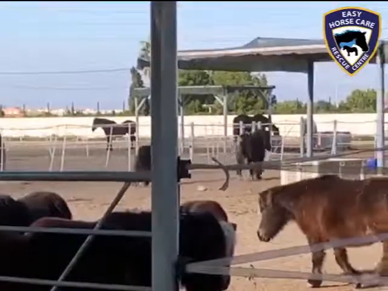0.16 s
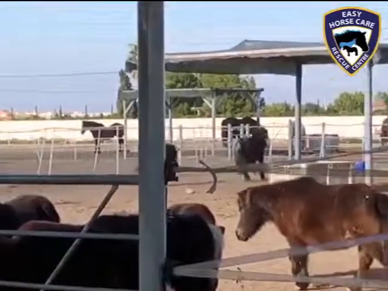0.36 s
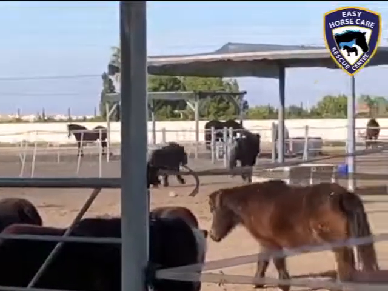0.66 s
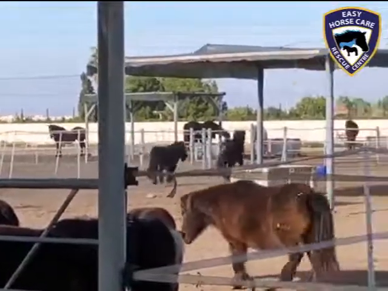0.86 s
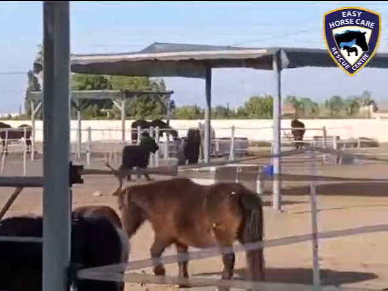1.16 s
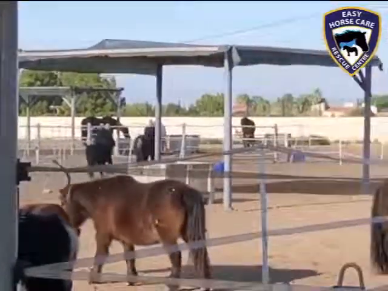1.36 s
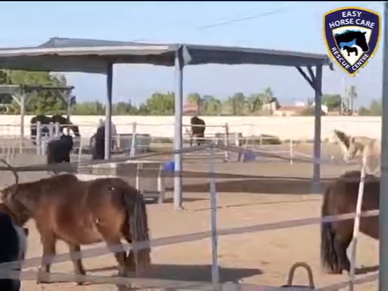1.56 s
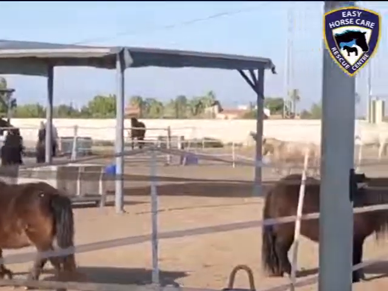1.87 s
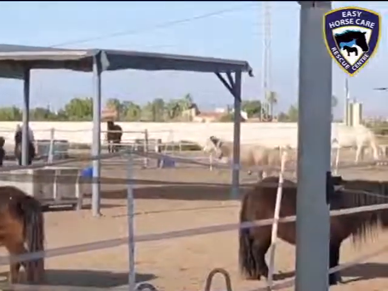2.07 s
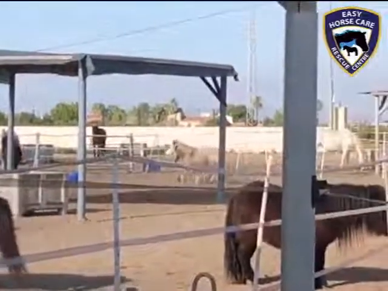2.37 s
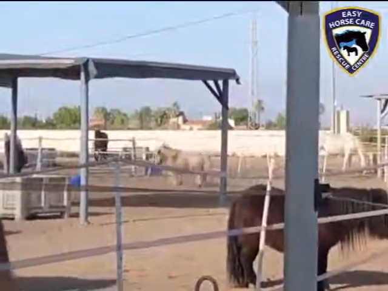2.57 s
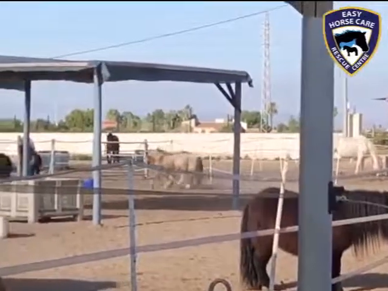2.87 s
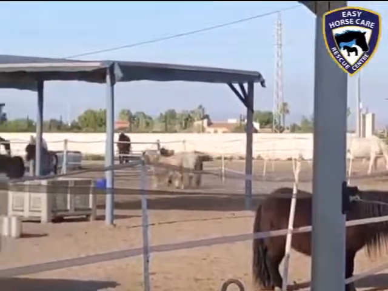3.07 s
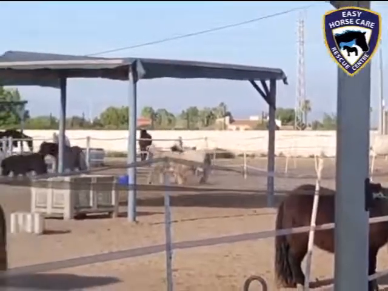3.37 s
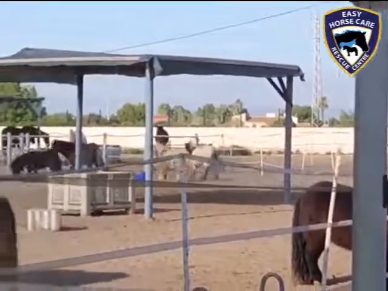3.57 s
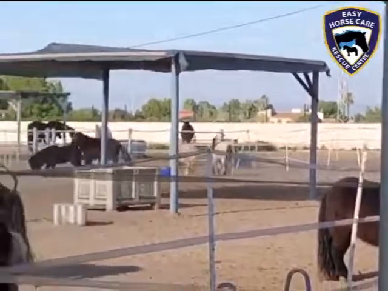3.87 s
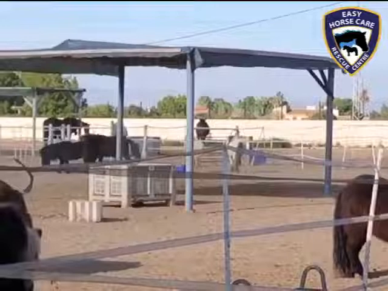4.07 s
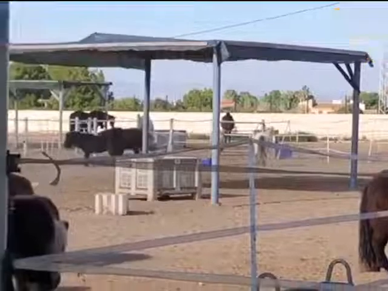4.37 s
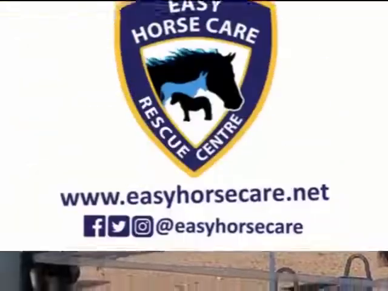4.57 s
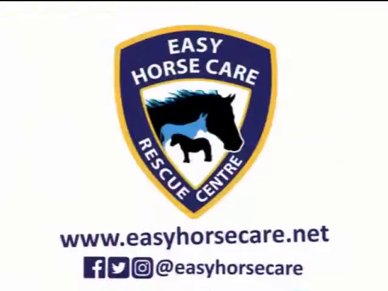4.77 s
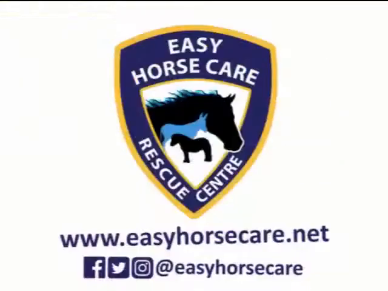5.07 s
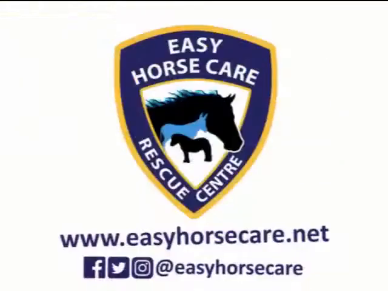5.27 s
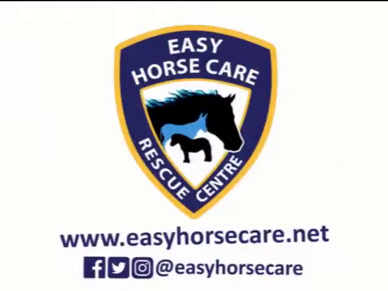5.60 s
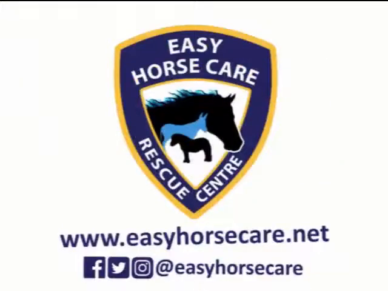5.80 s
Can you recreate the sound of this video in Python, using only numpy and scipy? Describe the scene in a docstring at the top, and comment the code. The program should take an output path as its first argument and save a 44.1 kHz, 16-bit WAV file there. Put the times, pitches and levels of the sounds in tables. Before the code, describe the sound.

Sparrow chirps, thin finch twitters and short buzzes over a soft distant hum, with four dry, sharp snaps at a steady pace. The ambience then gives way to a hissier, rumbling close pickup: breath thumps the microphone, one horse neighs high and wavering with a gritty throaty layer underneath, then cracks into low, flapping grunts and rasping breath.

```python
"""In a quiet paddock with far traffic (shaped noise), sparrows and a finch sing gliding sines and buzzing clicks,
while an electric fence sparks four times at a steady pace, each spark an impulse through resonances.
As the paddock fades, a hiss and rumble come in and a horse whinnies close to a microphone: a low fold vibration
and a high whistle, two oscillators whose sum and difference tones mix in the throat.
Breath thumps on the microphone; the neigh turns rough and ends in low grunts, slapping folds and rasping air."""
import sys
import numpy as np
from scipy import signal
from scipy.fft import rfft, irfft, next_fast_len
from scipy.io import wavfile
from scipy.ndimage import uniform_filter1d, map_coordinates

SR = 44100
rng = np.random.default_rng(int(sys.argv[2]) if len(sys.argv) > 2 else 0)


def log_audio(samples):
    """Write samples as a 16-bit WAV file to the path given in sys.argv[1]."""
    # one column per channel
    frames = np.atleast_2d(samples).T
    # limit to full scale, then quantise
    limited = np.clip(frames, -1, 1)
    pcm = np.round(limited * 32767).astype(np.int16)
    wavfile.write(sys.argv[1], SR, pcm)


N = 261909
T = np.arange(N) / SR  # time in seconds


def amp(db):
    """Level law: decibels to an amplitude ratio."""
    return 10 ** (np.asarray(db) / 20)


def unit(x):
    """Normalisation to an rms of 1."""
    return x / np.sqrt(np.mean(x ** 2) + 1e-20)


def curves(rows):
    """Linear interpolation: one value per sample for each column after the time."""
    s, *columns = np.transpose(rows)
    return [np.interp(T, s, column) for column in columns]


def during(rows):
    """Gating: 1 while a table lasts, with soft edges."""
    inside = (T > rows[0][0]) & (T < rows[-1][0])
    return uniform_filter1d(1. * inside, size=600)


def wobble(rate):
    """Band-limited random modulation: a smooth curve through rate random knots a second."""
    coarse = T[::16]
    knots = rng.standard_normal(int(N * rate / SR) + 4)
    return np.interp(T, coarse, map_coordinates(knots, [coarse * rate]))


def filtered(x, response):
    """Linear filtering: the spectrum of x times a complex response of frequency."""
    m = next_fast_len(N + SR // 2)
    return irfft(rfft(x, m) * response(np.fft.rfftfreq(m, 1 / SR)), m)[..., :N]


def resonances(modes):
    """Modal superposition: causal resonances of (Hz, width in Hz, dB) with alternating signs."""
    def response(f):
        total = 0
        for k, (centre, width, db) in enumerate(modes):
            damping = 1j * f * width
            total = total + (-1) ** k * amp(db) * damping / (centre * centre - f * f + damping)
        return total
    return response


def rush(spectrum, patchy_db):
    """Turbulence noise: coloured noise of rms 1 whose gain varies in random time-frequency patches."""
    z = signal.stft(rng.standard_normal(N), nperseg=512)[2]
    across_bands = uniform_filter1d(rng.standard_normal(z.shape), size=6, axis=0)
    patches = uniform_filter1d(across_bands, size=12, axis=1)
    x = signal.istft(z * amp(patchy_db * unit(patches)), nperseg=512)[1][:N]
    f, db = np.transpose(spectrum)
    return unit(filtered(x, lambda hz: amp(np.interp(np.log(hz + 1), np.log(f + 1), db))))


def echoes(x, t60, wet_db):
    """Diffuse reverberation: x plus a noise tail that falls 60 dB in t60 seconds."""
    t = T[:SR // 3]
    tail = amp(-60 * t / t60) * rng.standard_normal(len(t))
    return x + amp(wet_db) * signal.fftconvolve(x, tail / np.linalg.norm(tail))[:N]


def dull(x, hz, floor_db):
    """Treble shelving: a steep step down above hz to floor_db, then a steep cut above 12.8 kHz."""
    return filtered(x, lambda f: amp(floor_db) / (1 + (f / 12800) ** 30) + 1 / (1 + (f / hz) ** 24))


# The paddock fading away. Each row: time in seconds, level in dB.
YARD_LEVEL = [(0, -54), (4.1, -53), (4.5, -60), (4.8, -75)]
# Spectrum of the paddock. Each row: frequency in Hz, relative density in dB.
YARD_COLOUR = [(12, -40), (30, -36), (55, 1), (85, 1), (200, -15), (400, -20), (1100, -24), (2000, -29.5),
               (2650, -36.5), (4000, -35), (7200, -39), (9300, -46.5), (11500, -52), (13000, -74),
               (15800, -71)]
# Hiss fading in with the horse. Each row: time in seconds, level in dB.
HISS_LEVEL = [(4.1, -68), (4.4, -57.5), (4.8, -51), (5.94, -49)]
# Spectrum of the hiss. Each row: frequency in Hz, relative density in dB.
HISS_COLOUR = [(150, -25), (300, -25), (800, -5), (1100, -21.5), (2750, -16), (4800, -18), (6200, -5.5),
               (6800, -15.5), (7300, -29.5), (9300, -30.5), (13400, -51.5), (13800, -65)]
# Spectrum of the rumble. Each row: frequency in Hz, relative density in dB.
RUMBLE_COLOUR = [(12, -1.5), (40, -2), (110, -6.5), (200, -120)]


def background():
    """Shaped noise with slowly changing level: far traffic and leaves, then rumble and equally strong hiss."""
    yard = amp(curves(YARD_LEVEL)[0] + wobble(0.35)) * rush(YARD_COLOUR, patchy_db=2)
    hiss = rush(HISS_COLOUR, patchy_db=1.5)
    rumble = rush(RUMBLE_COLOUR, patchy_db=2.0)
    return yard + amp(curves(HISS_LEVEL)[0]) * during(HISS_LEVEL) * (hiss + rumble)


def song(notes, arch, flutter_db, warble):
    """Frequency modulation: each note is a sine that glides on an arch, with a fast warble."""
    out, shake = np.zeros(N), 1 + warble * wobble(130)
    for s, length, middle, glide, db in notes:
        u = np.linspace(-1, 1, int(length * SR))
        start = round(s * SR)
        at = slice(start, start + len(u))
        hz = (middle * (1 - arch * u ** 2) + glide / 2 * u) * shake[at]
        swell = np.sqrt(1 - u ** 2)
        out[at] += amp(db) * swell * np.sin(2 * np.pi * np.cumsum(hz) / SR)
    return out * amp(flutter_db * wobble(120))


def chatter(near, count, low_hz, high_hz, length, sweep, db):
    """Random point process: far birds' notes bunch up around the near bird's notes."""
    a, b = rng.random((count, 3)), rng.standard_normal((count, 3))
    hz = low_hz + (high_hz - low_hz) * a[:, 1]
    neighbour = (a[:, 0] * len(near)).astype(int)
    s = np.abs(np.array(near)[neighbour, 0] + .07 * b[:, 2])
    return np.c_[s, length * (.5 + a[:, 2]), hz, hz * sweep * b[:, 0], db + 2.5 * b[:, 1]]


# Runs of finch ticks. Each row: start in seconds, length in seconds, mean relative level in dB.
TWITTER_RUNS = [(0.853, .45, -73), (2.32, .27, -65), (2.968, .26, -68), (3.766, .2, -68)]
TICK_GAP_S, TICK_S = .058, .009
TICK_HZ, TICK_GLIDE_HZ = 6500, -2400  # mean pitch, steep fall


def ticks():
    """Periodic repetition: evenly spaced falling notes whose pitch and level scatter."""
    notes = []
    for s, length, db in TWITTER_RUNS:
        for t in np.arange(s, s + length, TICK_GAP_S):
            hz = TICK_HZ * (1 + 0.054 * rng.standard_normal())
            notes.append((t, TICK_S, hz, TICK_GLIDE_HZ, db + 2 * rng.standard_normal()))
    return notes


# Finch buzzes. Each row: start in seconds, length in seconds, mean relative level in dB.
BUZZES = [(2.795, 0.13, -66.5), (3.559, 0.092, -62.5), (4.06, 0.05, -62)]
# Resonances of the beak. Each row: frequency in Hz, width in Hz, level in dB.
BEAK = [(6040, 710, -8.5), (6850, 120, -3), (7650, 500, -17)]
BUZZ_PER_S = 160  # mean click rate


def buzzes():
    """Source and filter: fast, slightly irregular click trains excite the beak's resonances."""
    clicks = np.zeros(N)
    for s, length, db in BUZZES:
        t = np.arange(0, length, 1 / BUZZ_PER_S)
        swell = np.sin(0.48 + 2.36 * t / length)
        at = ((s + t + .0008 * rng.standard_normal(len(t))) * SR).astype(int)
        # 40 dB makes up for the little energy of a one-sample click
        clicks[at] = swell * amp(db + 40.0 + 3.8 * rng.standard_normal(len(t)))
    return filtered(clicks, lambda f: resonances(BEAK)(f) * np.exp(-((f - 6800) / 1800) ** 4))


# Near sparrow chirps. Each row: start in seconds, length in seconds, middle in Hz, glide in Hz,
# relative level in dB.
SPARROWS = [(.135, 0.044, 4200, -1400, -75), (.345, 0.048, 3930, 500, -58), (.4, 0.025, 3450, -300, -58),
            (.66, 0.042, 3900, 302, -69), (.905, 0.018, 5200, -1600, -66), (.94, 0.045, 3710, -200, -62.5),
            (1.02, 0.044, 3230, 300, -66), (1.085, .016, 4260, -400, -57),
            (1.13, 0.045, 3595, -1100, -61.5), (1.435, 0.067, 4400, -900, -69),
            (1.49, 0.049, 3840, -600, -61), (1.625, 0.022, 3760, 800, -65),
            (1.89, 0.026, 4300, 1798, -63.5), (1.99, 0.053, 3770, 800, -61.5), (2.005, 0.012, 5680, 0, -59),
            (2.278, 0.038, 3350, -400, -57.5), (2.37, 0.024, 3810, 300, -57),
            (2.39, 0.032, 3320, -50, -59.5), (2.91, 0.068, 4480, -2200, -63.5),
            (2.975, .03, 3330, -300, -65), (3.234, 0.027, 4210, 500, -56.5),
            (3.25, .051, 3320, -500, -59.5), (3.275, 0.026, 3930, -250, -61.5),
            (3.669, 0.042, 4530, 598, -65), (3.681, 0.028, 5220, 600, -55),
            (3.924, 0.055, 4100, -1100, -60), (3.96, 0.047, 3620, 304, -56.5),
            (4.004, 0.014, 5420, 200, -51.5), (4.24, .05, 4310, -900, -64)]
# Near finch notes. Each row: start in seconds, length in seconds, middle in Hz, glide in Hz,
# relative level in dB.
FINCH = [(.53, .035, 6170, -500, -70), (1.555, .067, 6800, 1100, -68), (1.71, 0.051, 7600, 2200, -73),
         (1.97, 0.012, 7500, 1200, -68), (2.142, 0.0047, 6600, 2400, -60), (2.2, 0.023, 6470, -100, -63),
         (2.262, .013, 6160, -2300, -62.5), (2.635, 0.055, 7160, 505, -67), (2.753, 0.02, 5630, 900, -64),
         (3.018, 0.013, 7600, 600, -63), (3.12, 0.014, 7500, 300, -56.5),
         (3.252, 0.054, 6630, -2300, -56.5), (3.382, 0.0071, 7620, -2500, -56.5),
         (3.397, .014, 6900, -2500, -58), (3.5, .011, 7050, -2200, -61.5), (3.79, 0.012, 6970, -400, -52.5),
         (3.953, 0.02, 7430, -1100, -58)]
SPARROW_ARCH, FINCH_ARCH = 0.0847, 0.037  # share by which the arch lowers a note's ends


def birds():
    """Superposition: near and far notes of each species share one reverberant tail."""
    far = chatter(SPARROWS, count=300, low_hz=2900, high_hz=5000, length=.022, sweep=.24, db=-74)
    twitter = chatter(FINCH, count=80, low_hz=5700, high_hz=7700, length=.009, sweep=.16, db=-71)
    chirps = song(np.r_[SPARROWS, far], SPARROW_ARCH, flutter_db=3, warble=.025)
    notes = song(np.r_[FINCH, ticks(), twitter], FINCH_ARCH, flutter_db=2, warble=.008)
    sparrows = echoes(chirps, t60=.2, wet_db=-2)
    finch = echoes(notes + buzzes(), t60=.1, wet_db=-10)
    return amp(0.5) * sparrows + amp(5) * finch


# Relative level of each spark, in dB.
SPARK_DB = [-52, -34, -32.5, -33]
# Direct snap, then ground, posts and wall. Each row: delay in seconds, relative level in dB.
SPARK_ECHOES = [(0, 2), (.0014, 5), (.003, -13), (0.018, -11)]
# Resonances of the snap. Each row: frequency in Hz, width in Hz, level in dB.
SNAP = [(3460, 6400, -17.5), (5600, 1600, 0), (8400, 5200, -6), (11200, 1800, -17)]
SPARK_S, SPARK_GAP_S = .315, 1.2292  # first spark, spacing


def fence():
    """Impulse response: each spark is one snap with close reflections."""
    snaps = np.zeros(N)
    for k, db in enumerate(SPARK_DB):
        for lag, echo_db in SPARK_ECHOES:
            at = round((SPARK_S + k * SPARK_GAP_S + lag) * SR)
            snaps[at] += amp(db + echo_db + 12.5)
    return echoes(filtered(snaps, resonances(SNAP)), t60=0.035, wet_db=-1.5)


def pushes(events, length):
    """Pressure pulses: smooth single humps of the given length in seconds."""
    return sum(amp(db) * np.exp(-((T - s) / length) ** 2) for s, db in events)


# Air puffs on the microphone. Each row: time in seconds, level in dB.
THUMPS = [(4.7171, -14), (4.828, -29)]


def thumps():
    """Damped oscillation: a puff dents the diaphragm, which swings back at 72 Hz and settles."""
    out = -pushes(THUMPS, .0005)
    for s, db in THUMPS:
        u = np.maximum(T - s, 0)
        out += amp(db) * np.sin(2 * np.pi * 72 * u) * np.exp(-u / .0045)
    return out


# Exhaled air sweeping the microphone. Each row: start in seconds, starting level in dB.
BLOWS = [(5.11, -31.5), (5.839, -33)]
# Spectrum of the buffeting. Each row: frequency in Hz, relative density in dB.
AIR_COLOUR = [(20, -14), (50, -20), (150, 8), (240, -2.5), (450, -12.5), (1000, -25.5), (2000, -120)]
BLOW_FADE_DB_PER_S, DRAUGHT_DB = 71, -2  # fall of a blow; draught relative to the hiss
FLAP_S, FLAP_GAP_S, FLAP_DB = 5.8795, .0161, -24  # slack folds slap shut: first slap, spacing, level


def breath():
    """Flow noise and high-pass response: air buffets the microphone, which cuts the slaps' lowest bass."""
    cut = lambda f: (1j * f / (45 + 1j * f)) ** 2
    blows = sum(amp(db - BLOW_FADE_DB_PER_S * (T - s)) * (T > s) for s, db in BLOWS)
    draught = amp(curves(HISS_LEVEL)[0] + DRAUGHT_DB) * during(HISS_LEVEL)
    air = uniform_filter1d(blows, size=200) + draught
    buffet = air * amp(1.5 * wobble(30)) * rush(AIR_COLOUR, patchy_db=2.5)
    flaps = [(FLAP_S + k * FLAP_GAP_S, FLAP_DB) for k in range(4)]
    return filtered(pushes(flaps, 0.0022), cut) + thumps() + buffet


# Resonances of the mouth. Each row: frequency in Hz, width in Hz, level in dB.
MOUTH = [(1430, 340, -8.5), (1992, 320, -2.5), (2350, 450, -2.5), (3100, 180, 0), (3420, 800, -9),
         (3885, 130, -2.5), (4730, 2600, -21), (5550, 200, -7.5), (6340, 350, -10.5)]


def rasp(low):
    """Modulated turbulence: air bursts once a fold cycle and excites the mouth, at rms 1."""
    puffs = rng.standard_normal(N) * (1 + 0.5 * np.cos(low)) * amp(2.1 * wobble(40))
    return unit(filtered(puffs, resonances(MOUTH)))


# Full closures of the folds. Each row: middle in seconds, length in seconds, level in dB.
GRUNTS = [(4.602, 0.048, -43.5), (5.591, 0.028, -32.5), (5.734, 0.031, -28.5), (5.801, .09, -27.5)]
# Overtones of the low voice. Each row: multiple of the low pitch, relative level in dB.
LOW_OVERTONES = [(2, -1), (3, -11)]
FOLD_DB, FOLD_OVER_DB = -22, -9.5  # low fundamental and overtones relative to the rasp
GRUNT_OVER_DB = -25  # overtones of a grunt relative to its fundamental


def folds(low, loose, flow_db):
    """Harmonic series: where the folds close fully, the low fundamental booms as a grunt."""
    grunt = sum(amp(db) * np.exp(-(2 * (T - s) / length) ** 4) for s, length, db in GRUNTS)
    over = amp(flow_db + FOLD_OVER_DB) + amp(GRUNT_OVER_DB) * grunt
    out = (grunt + amp(flow_db + FOLD_DB)) * np.sin(low)
    for k, db in LOW_OVERTONES:
        out += over * amp(db + 3.7 * wobble(45)) * np.sin(k * loose)
    return out


def tone(phase, rough):
    """Amplitude modulation: each tone flutters alone, more deeply with roughness."""
    return np.sqrt(2) * amp((2.5 + 4.4 * rough) * wobble(50)) * np.sin(phase)


# Instants at which the voice catches. Each row: time in seconds, depth in dB, width in seconds.
CATCHES = [(5.032, 21, 0.014), (5.097, 9, 0.0082), (5.2, 7.5, 0.0094), (5.27, 5, 0.0046),
           (5.361, 13, 0.0072), (5.394, 12, 0.011), (5.488, 9, 0.0065)]
QUAVER_DB = 0.5  # overtone swell on a crest of the quaver, at its widest


def whistle(high, high_db, overtone_db, quaver, rough):
    """Two-partial tone: a fundamental that catches for instants, and its octave."""
    catch_db = sum(db * np.exp(-((T - s) / width) ** 2) for s, db, width in CATCHES)
    fundamental = amp(-catch_db) * tone(high, rough)
    octave = amp(overtone_db + QUAVER_DB * quaver) * tone(2 * high, rough)
    return amp(high_db) * (fundamental + octave)


# Tones born where both voices mix. Each row: multiple of the high pitch, multiple of the low pitch,
# relative level in dB.
MIXED = [(1, -1, -13), (1, 1, -10.5), (1, 2, 5.5), (1, 3, -3.5), (2, -1, -14.5), (2, 1, -5), (2, 2, -2.5),
         (2, 3, -12.5), (2, 4, -10), (2, 5, -11), (3, 0, -10.5), (3, 1, -20), (3, 2, -27), (3, 3, -16.5),
         (3, 4, -20)]
LOCK_S, LOCK_RISE_S = 4.74, 0.027  # the two voices begin to mix
MIX_DB = -4.5  # mixed tones relative to the rasp


def mixed_tones(high, loose, flow_db, rough):
    """Intermodulation: sum and difference tones sink with roughness, the higher multiples most."""
    total = 0
    for a, b, db in MIXED:
        level_db = flow_db + MIX_DB + db - 8.2 * a * rough ** 2 + 2.2 * wobble(25)
        phase = a * high + b * loose + .2 * a * wobble(150)
        total = total + amp(level_db) * tone(phase, rough)
    return np.clip((T - LOCK_S) / LOCK_RISE_S, 0, 1) * total


# Band missing from the whinny: frequency in Hz, width in Hz.
NOTCH_BAND = (2724, 190)


def notch(f):
    """Band-stop filtering: a deep notch near 2.7 kHz."""
    hz, width = NOTCH_BAND
    return 1 - .97 * np.exp(-((f - hz) / width) ** 4)


# High voice. Each row: time in seconds, pitch in Hz before the quaver, level in dB,
# overtone relative to the fundamental in dB, roughness from 0 to 1.
HIGH = [(4.625, 1039, -53.5, -22, 0.31), (4.66, 1243, -40.5, -11, 0.07), (4.745, 1546, -44, -21, 0.19),
        (4.785, 1585, -44, 0, 0), (4.83, 1617, -34.5, -1.5, 0), (4.92, 1663, -48, 0.5, 0.01),
        (4.98, 1694, -29.5, -6.5, 0.22), (5.3, 1677, -31, -2.5, .15), (5.55, 1638, -28, -12, 0.19),
        (5.575, 1343, -40, -26, 0.53), (5.62, 1289, -39, -1, 0.59), (5.675, 1565, -31, -8, .4),
        (5.715, 1325, -37, -20, .62), (5.87, 1291, -53, -18, .75)]
# Low voice. Each row: time in seconds, mean pitch in Hz.
LOW = [(4.55, 185.3), (4.63, 269.8), (4.77, 300.3), (4.88, 317.5), (5.15, 285.1), (5.41, 283.2),
       (5.445, 242.8), (5.48, 274.4), (5.54, 271.6), (5.58, 220.9), (5.69, 220.4), (5.74, 148.4),
       (5.79, 180.5), (5.83, 187.3), (5.87, 138.7)]
# Air flow through the throat. Each row: time in seconds, level of its rasp in dB.
FLOW = [(4.59, -73), (4.62, -60), (4.8, -55), (4.92, -46), (5.12, -39), (5.5, -37.5), (5.71, -36),
        (5.75, -46), (5.81, -41.5), (5.86, -48.5), (5.94, -44.5)]
# the held whistle quavers ever wider until it breaks
QUAVER_FROM_S, QUAVER_TO_S, QUAVER_CREST_S = 4.832, 5.55, 5.25
QUAVER_PER_S, QUAVER_HZ = 7.8, 44.3  # rate; pitch swing at the break


def whinny():
    """Biphonation: two vocal oscillators, their sum and difference tones, and turbulent air."""
    high_hz, high_db, overtone_db, rough = curves(HIGH)
    low_hz, flow_db = curves(LOW)[0], curves(FLOW)[0]
    grows = np.clip((T - QUAVER_FROM_S) / (QUAVER_TO_S - QUAVER_FROM_S), 0, 1) * (T < QUAVER_TO_S)
    quaver = grows ** 1.42 * np.cos(2 * np.pi * QUAVER_PER_S * (T - QUAVER_CREST_S))
    jitter = 0.00284 * wobble(60) + (0.011 * rough + 0.255 * rough ** 4) * wobble(250)
    high = 2 * np.pi * np.cumsum((high_hz + QUAVER_HZ * quaver) * (1 + jitter)) / SR
    low = 2 * np.pi * np.cumsum(low_hz * (1 + 0.013 * wobble(60))) / SR
    # in the rough part the mixed tones and low overtones lose their lock and spread into noise
    loose = low + 2.06 * rough ** 2 * wobble(400)
    upper = whistle(high, high_db, overtone_db, quaver, rough)
    upper += mixed_tones(high, loose, flow_db, rough)
    voice = during(HIGH) * upper + during(LOW) * folds(low, loose, flow_db)
    voice += amp(flow_db) * during(FLOW) * rasp(low)
    return filtered(echoes(voice, t60=0.21, wet_db=-9), notch)


def scene():
    """Superposition: every source summed, alike in both channels."""
    paddock = background() + birds() + dull(fence(), 11100, floor_db=-8.5)
    horse = breath() + dull(whinny(), 6780, floor_db=-13)
    mono = paddock + horse
    return np.array([mono, mono])


TOP_HZ = 15700


def record(dry):
    """Band limiting: nothing is kept above the top frequency."""
    return filtered(dry, lambda hz: hz < TOP_HZ)


dry = scene()
out = record(dry)
log_audio(out)
```